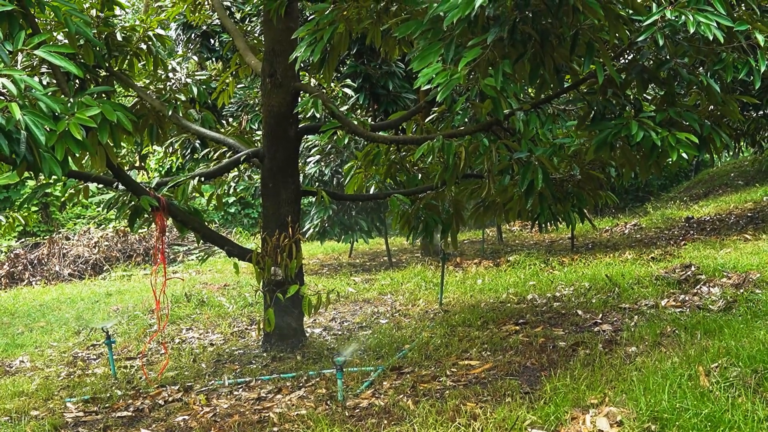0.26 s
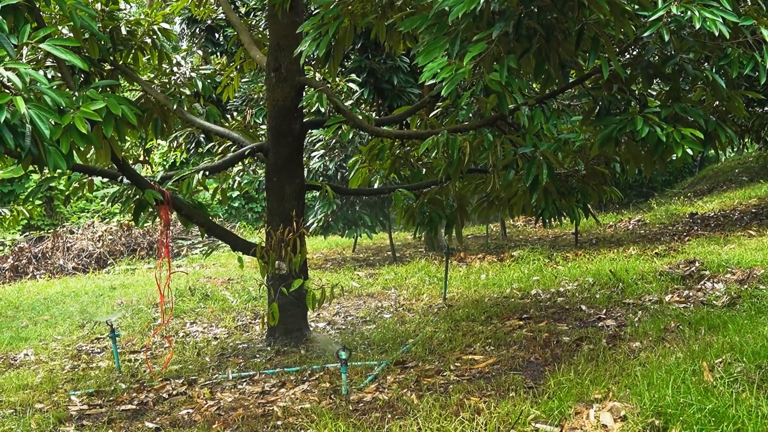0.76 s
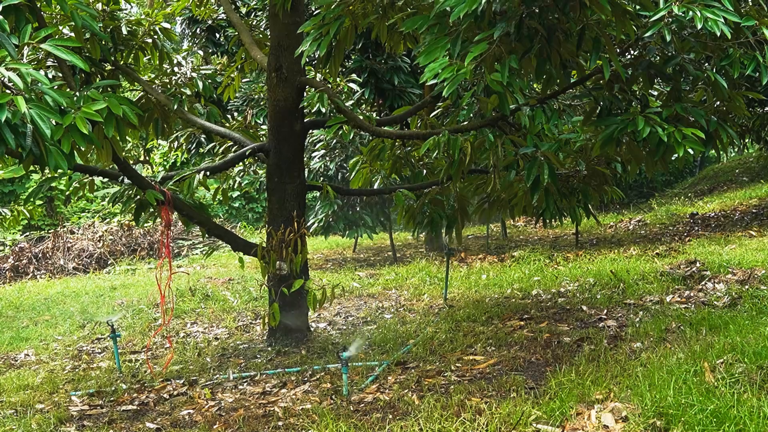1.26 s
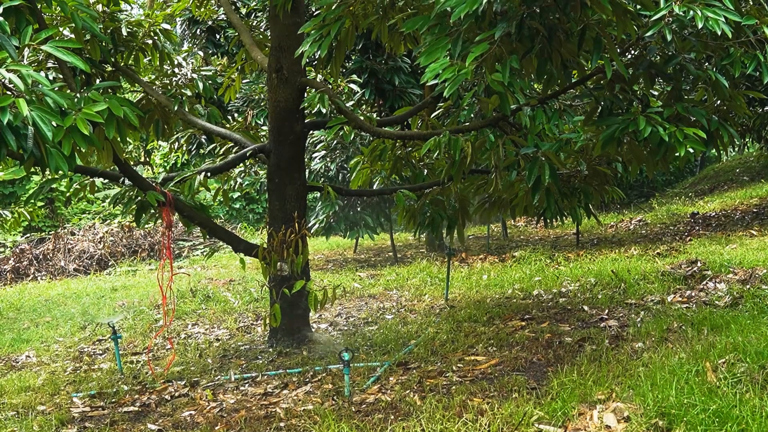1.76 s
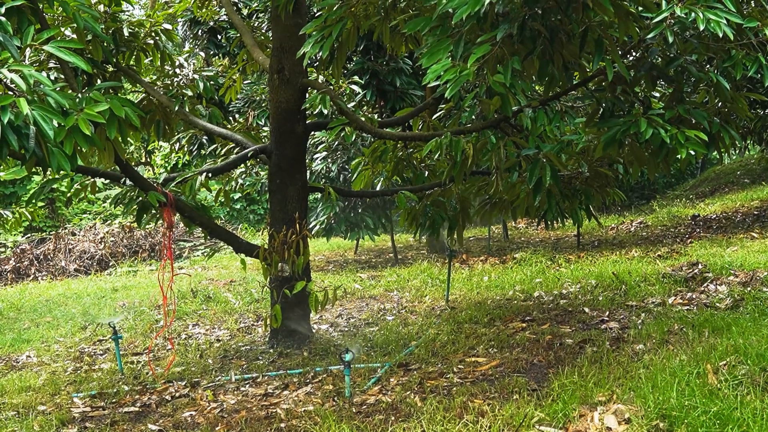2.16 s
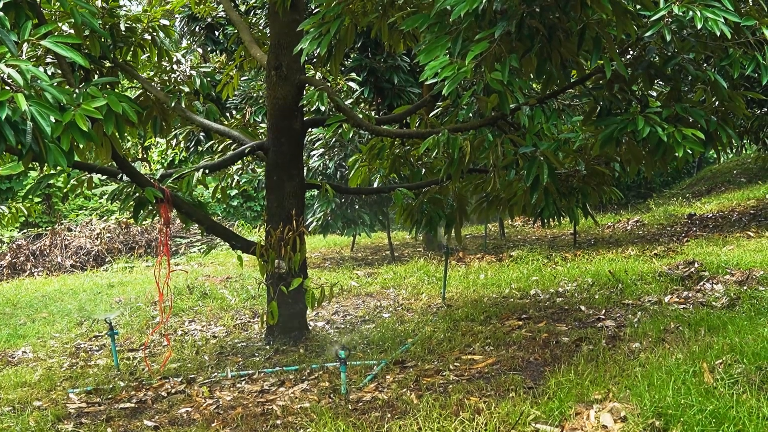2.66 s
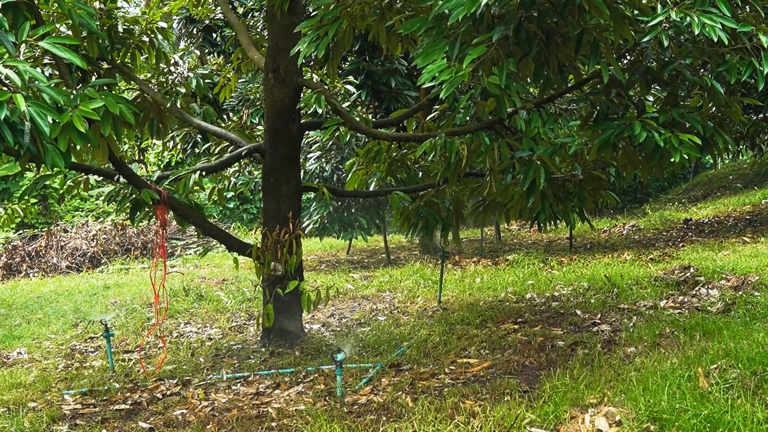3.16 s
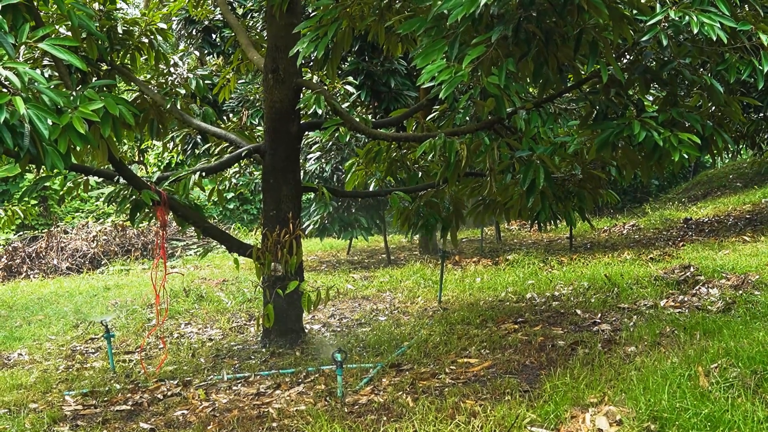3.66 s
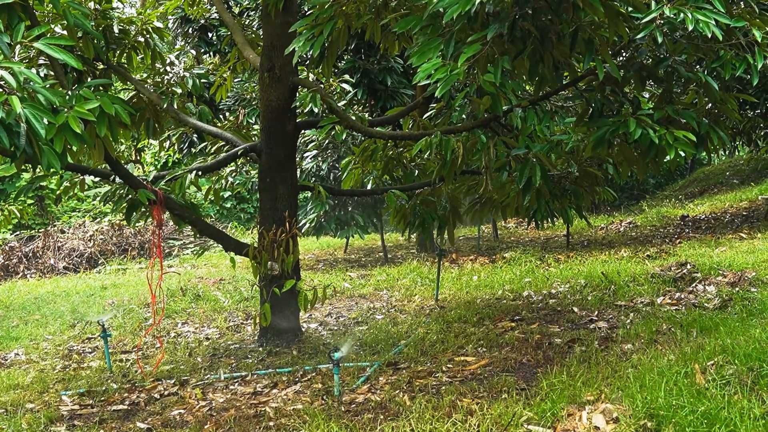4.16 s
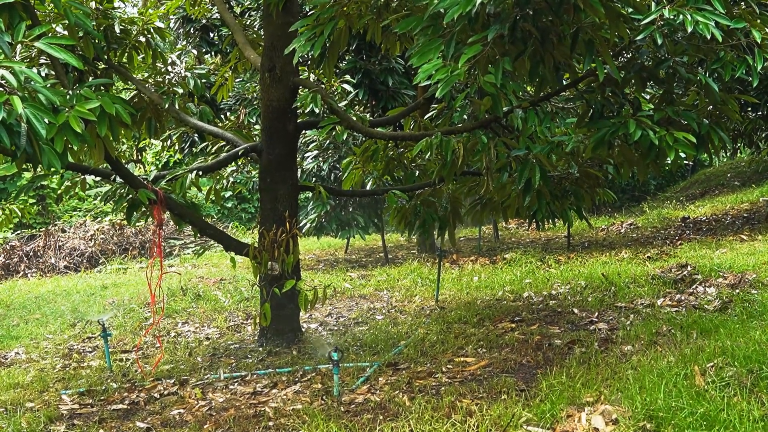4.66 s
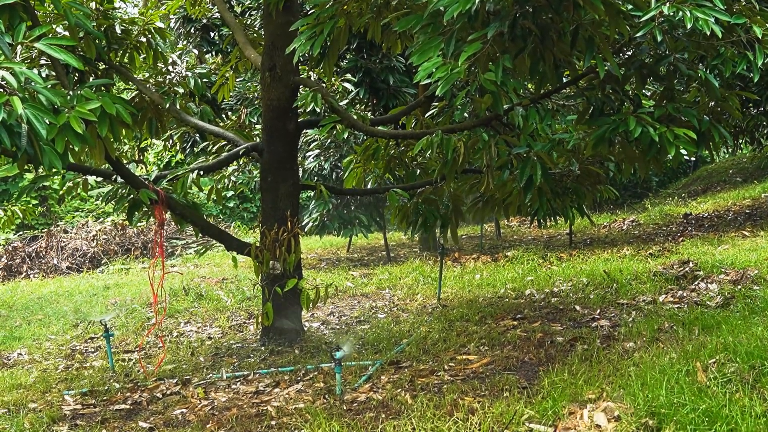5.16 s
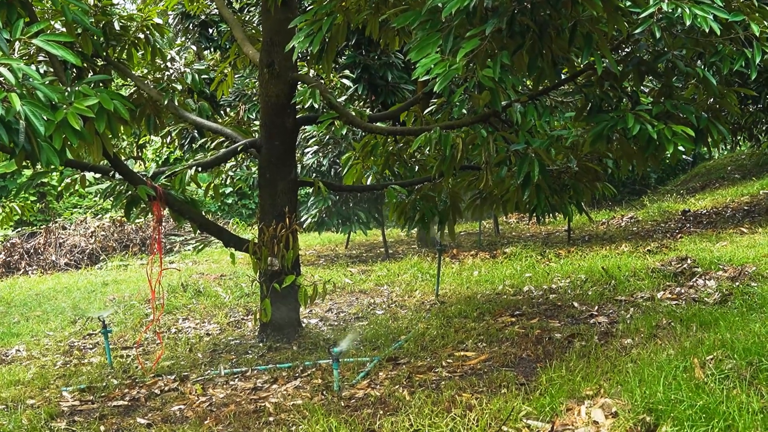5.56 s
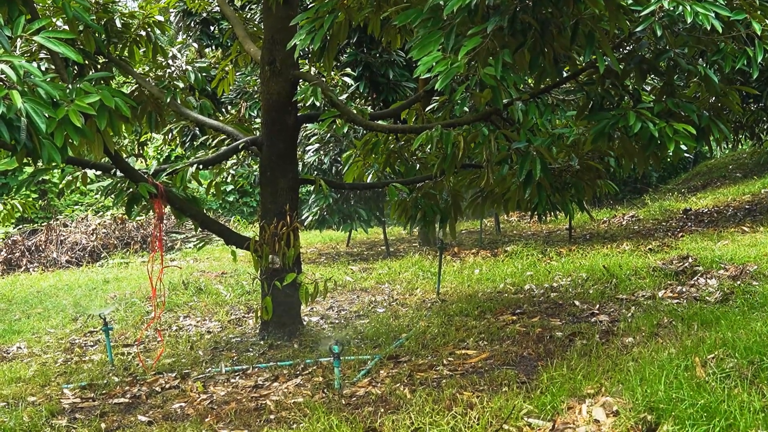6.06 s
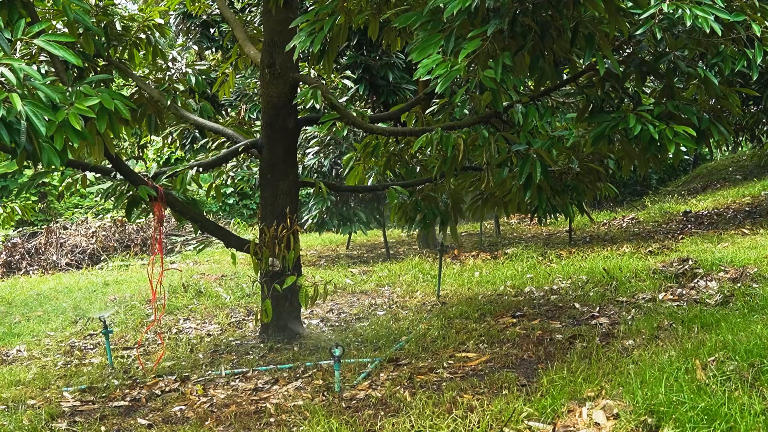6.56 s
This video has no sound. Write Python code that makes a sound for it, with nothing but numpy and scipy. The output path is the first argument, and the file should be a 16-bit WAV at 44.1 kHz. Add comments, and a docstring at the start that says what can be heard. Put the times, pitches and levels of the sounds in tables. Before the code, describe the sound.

Sprinklers under a leafy tree hiss without a break, their jets pattering on leaves in fast, soft pulses. Irregular heavy drops click and spatter nearby. High bird chips and a thin whistle come at about one second and again just after four; low, brief hoots with weak outdoor echoes answer from farther away. A faint, very high insect trill and rasp persists, with light breeze rumbling on the single microphone, the same in both channels.

```python
"""A smooth hiss of fine spray, made from coloured noise, runs throughout: sprinklers spin in an orchard.
Their jets sweep the leaf litter in quick flutters of random clicks, and fat drops tick and splash.
A small bird whistles twice and a larger one hoots further off, as gliding tones with weak echoes.
Pulsing tones near 7 kHz make insects trill and rasp; low noise makes light air rumble on a mono microphone."""
import sys
import numpy as np
from scipy import signal
from scipy.fft import rfft, irfft
from scipy.io import wavfile
from scipy.ndimage import uniform_filter1d

SR = 44100
rng = np.random.default_rng(int(sys.argv[2]) if len(sys.argv) > 2 else 0)


def log_audio(samples):
    """Write samples as a 16-bit WAV file to the path given in sys.argv[1]."""
    # one column per channel
    frames = np.atleast_2d(samples).T
    # limit to full scale, then quantise
    limited = np.clip(frames, -1, 1)
    pcm = np.round(limited * 32767).astype(np.int16)
    wavfile.write(sys.argv[1], SR, pcm)


N = 299880
TIME = np.arange(N) / SR

# colour of the even wash of mist and far sprinklers: (frequency [Hz], relative level [dB per Hz])
WASH_COLOUR = [(88, -22), (150, -1), (382, -1), (421, -1.5), (512, -1.5), (713, -0.5), (1360, 0.5),
               (2300, -1), (4370, -2.5), (5740, -6), (6450, -3.5), (6840, -9), (7530, -6.5), (12500, -10.5),
               (15800, -11)]
# colour of droplets landing on dry leaves: (frequency [Hz], relative level [dB per Hz])
PATTER_COLOUR = [(500, -29.5), (2000, -20), (4500, -1), (7000, 3), (9500, 2.5), (11000, -1), (12500, 2),
                 (14000, -8), (16000, -3)]
# one row a sprinkler head: (sweeps [per s], sharpness of the sweep [no unit], level [dB])
SPRINKLER_HEADS = [(21.43, 3.6, -51.5), (11.84, 2, -50), (13.17, 2.4, -55)]
# the leaves that droplets land on: (ring [Hz], width [Hz])
LEAF_RINGS = [(4500, 2800), (7500, 1500), (10000, 1000), (12500, 3700), (15000, 3800)]
# fat drops at set times; the row at 0.966 s adds a tick and splash under the small bird's second chip: (time
# [s], tick peak [dB], centre [Hz], splash level at its start [dB])
FAT_DROPS = [(.1576, -17, 5500, -40), (.1697, -16, 5000, -34), (.913, -24, 8500, -37.5),
             (.966, -25, 4500, -41), (1.211, -23, 5000, -39.5), (1.4232, -12.5, 4000, -39.5),
             (1.8914, -17.5, 14000, -40), (2.9537, -18, 3600, -37.5), (2.9665, -20, 8500, -37.5),
             (4.1442, -16.5, 4000, -37.5), (4.154, -20, 6000, -42), (4.579, -23, 6000, -43.5),
             (5.051, -22, 6500, -40), (5.4562, -16.5, 2800, -34.5), (5.921, -23, 5000, -38.5),
             (5.97, -23, 9500, -37)]
# small bird: (start [s], rise [s], fall [s], top pitch [Hz], end pitch [Hz], level before force [dB])
WHISTLE_NOTES = [(.927, 0.0098, 0.017, 6400, 4620, -36), (.965, .004, 0.0102, 6800, 4500, -40),
                 (1.064, .039, .093, 6040, 4570, -36.5), (4.097, .012, 0.015, 6340, 4140, -36.5),
                 (4.247, .032, .110, 6050, 4302, -35.5)]
# force along a whistle: (share of its length [0 to 1], added level [dB])
WHISTLE_FORCE_CURVE = [(0, -7.5), (.24, 3), (.5, -10.5), (.68, -4), (.85, 2), (1, 1.5)]
# how a whistle's pitch curves up to its top and down again: (rise power [no unit], fall power [no unit])
WHISTLE_CURVE = (2.5, 1.8)
# far bird: (start [s], rise [s], fall [s], foot pitch [Hz], top pitch [Hz], level before accent [dB],
# accent [dB], overtone level before the throat [dB])
HOOT_NOTES = [(1.574, 0.052, 0.04, 501, 726, -42.5, -3, -38.5),
              (3.82, 0.056, 0.042, 565, 955, -41, 8.5, -44), (3.96, 0.079, .042, 419, 955, -41, -1, -46),
              (4.147, .054, 0.051, 443, 750, -45, 1, -40), (5.921, 0.06, .029, 608, 970, -43.5, 10, -38),
              (6.316, 0.043, 0.03, 661, 941, -39.5, 6.5, -39),
              (6.684, 0.049, 0.025, 675, 930, -38.5, 8.5, -37)]
# every hoot climbs, lingers, tops out and drops:
# (phase [0 start, 1 top, 2 end], share of the way from foot to top pitch [0 to 1])
HOOT_PITCH_ARCH = [(0, 0), (.3, .42), (.62, .55), (.82, .86), (1, 1), (1.35, .65), (2, 0)]
# the throat resonance that shapes the far bird's overtone: (frequency [Hz], added level [dB])
THROAT_RESONANCE = [(1000, -13), (1200, -9.5), (1340, -4), (1450, -10), (1700, -15.5)]
# insects: (pitch [Hz], typical pitch wander [Hz], pulses [per s], level before swells [dB])
INSECT_VOICES = [(6940, 42.2, 19.4, -55), (6980, 70, 17, -53.5), (7050, 100, 94, -54)]
# colour of air on the microphone: (frequency [Hz], relative level [dB per Hz])
RUMBLE_COLOUR = [(3, -13), (8, -5), (11, -1.5), (16, -1), (22, -6.5), (30, -11), (45, -19), (60, -17.5),
                 (90, -21.5), (125, -20), (180, -32.5), (300, -34), (1000, -84)]
# strength of the breeze, before smoothing and the lift in air(): (time [s], level [dB])
BREEZE_STRENGTH = [(0.0, -44.5), (1.59, -41.5), (1.66, -50), (2.05, -32), (2.33, -45), (2.9, -44),
                   (2.93, -32), (3.05, -45), (3.39, -40.5), (4.75, -49.5), (4.85, -57), (5.13, -35.5),
                   (5.3, -55), (5.79, -40), (6.04, -51), (6.51, -43.5), (6.65, -58), (6.8, -48)]


def mist(hiss_db=-38.2, treble_db=-1.5, swell_db=0.07):
    """Fine spray everywhere merges into a smooth hiss, with slightly softened treble."""
    hiss = colour(rng.standard_normal(N), WASH_COLOUR)
    treble_filter = signal.butter(2, 5500, "high", fs=SR, output="sos")
    treble = signal.sosfiltfilt(treble_filter, hiss)
    softened = hiss + (amp(treble_db) - 1) * treble
    return amp(hiss_db + swell_db * drift(3.2)) * softened


def sprinklers(drops_per_s=1400, spread_db=5.0, wander_turns=.12, surge=0.42):
    """Each spinning jet throws a shower onto the leaves once a sweep; each leaf ticks at its own pitch."""
    out = np.zeros(N)
    for sweeps_per_s, sharpness, db in SPRINKLER_HEADS:
        turns = sweeps_per_s * TIME + rng.random() + wander_turns * drift(.5)
        shower = np.exp(sharpness * np.cos(2 * np.pi * turns) + surge * drift(5))
        per_s = drops_per_s * shower / shower.mean()
        ticks = sum(band(droplets(per_s, spread_db), hz, width_hz) for hz, width_hz in LEAF_RINGS)
        out += amp(db) * colour(ticks, PATTER_COLOUR)
    return out


def drips(stray_per_s=2, stray_tick_db=-23, stray_splash_db=-48, low_hz=5000, high_hz=12000):
    """The wet tree sheds fat drops at set times, and lesser ones at random."""
    out = np.zeros(N)
    for start, *drop in FAT_DROPS:
        add(out, start, drip(*drop))
    for when, leaf in rng.random((round(stray_per_s * N / SR), 2)):  # both are shares from 0 to 1
        leaf_hz = low_hz + (high_hz - low_hz) * leaf
        add(out, when * N / SR, drip(stray_tick_db, leaf_hz, stray_splash_db))
    return out


def drip(tick_db, hz, splash_db, splash_per_s=7000, decay_s=.022):
    """A fat drop slaps a leaf, then its fragments patter down around it as the splash dies away."""
    t = np.arange(SR // 8) / SR
    leaf = signal.butter(1, [hz / 2, min(hz * 1.6, 18000)], "band", fs=SR)
    tick = signal.lfilter(*leaf, signal.unit_impulse(len(t)))
    fragments = droplets(np.full(len(t), splash_per_s), 2.2)
    splash = evened(signal.lfilter(*leaf, fragments)) * np.exp(-t / decay_s)
    return amp(tick_db) * tick / abs(tick).max() + amp(splash_db) * splash


def droplets(per_s, spread_db):
    """Random clicks at a rate that may vary: many small, a few large."""
    size = amp(spread_db * np.minimum(rng.exponential(1, len(per_s)), 6))
    sign = rng.choice([-1, 1], len(per_s))
    lands = rng.random(len(per_s)) < per_s / SR
    return size * sign * lands


def birds(whistle_echo_db=-7, hoot_echo_db=-13):
    """The ground throws both birds back at once and the slope the hoots a little later; trees scatter both."""
    whistles, hoots = small_bird(), far_bird()
    out = whistles + hoots + trees(amp(whistle_echo_db) * whistles + amp(hoot_echo_db) * hoots)
    # the ground's copy beats against each gliding call
    add(out, .00393, amp(-8) * whistles + amp(-4.5) * hoots)
    add(out, .029, amp(-16) * hoots)  # the slope
    return out


def small_bird(flutter_db=2, foot=.82):
    """A short chip or two, then a thin whistle: each climbs from a share (foot) of its top and falls away."""
    out = np.zeros(N)
    rise_power, fall_power = WHISTLE_CURVE
    for start, rise_s, fall_s, top_hz, end_hz, db in WHISTLE_NOTES:
        t = np.arange(0, rise_s + fall_s, 1 / SR)
        climb_left = np.clip(1 - t / rise_s, 0, 1)
        fall = np.clip((t - rise_s) / fall_s, 0, 1)
        hz = top_hz * (1 - (1 - foot) * climb_left ** rise_power)
        hz = hz + (end_hz - top_hz) * fall ** fall_power
        force_db = np.interp(t / t[-1], *np.transpose(WHISTLE_FORCE_CURVE))
        flutter = evened(band(rng.standard_normal(len(t)), 0, 86))
        level = amp(db + force_db + flutter_db * flutter)
        tone = np.sin(waver(hz, jitter=0.007))
        add(out, start, level * signal.windows.tukey(len(t), .1) * tone)
    return out


def far_bird(accent_at=0.51, accent_s=0.011):
    """Arching hoots with an accent part way up the rise; the overtone flares at the throat resonance."""
    out = np.zeros(N)
    for start, rise_s, fall_s, foot_hz, top_hz, db, accent_db, overtone_db in HOOT_NOTES:
        t = np.arange(0, rise_s + fall_s, 1 / SR)
        stage = np.interp(t, [0, rise_s, rise_s + fall_s], [0, 1, 2])
        arch = np.interp(stage, *np.transpose(HOOT_PITCH_ARCH))
        hz = foot_hz + (top_hz - foot_hz) * arch
        push = np.exp(-.5 * ((t - accent_at * rise_s) / accent_s) ** 2)
        phase = waver(hz, jitter=.008)
        main_tone = amp(db + accent_db * push) * np.sin(phase)
        overtone = amp(overtone_db + read(THROAT_RESONANCE, 2 * hz)) * np.sin(2 * phase)
        add(out, start, (main_tone + overtone) * signal.windows.tukey(len(t), .25))
    return out


def waver(hz, jitter):
    """The phase of a slightly unsteady pitch; jitter is its typical share of the pitch."""
    shake = evened(band(rng.standard_normal(len(hz)), 0, 79.0))
    return 2 * np.pi * np.cumsum(hz * (1 + jitter * shake)) / SR


def trees(x, t60=0.19, first_s=0.011):
    """Trunks and foliage scatter weak echoes that fade by 60 dB every t60 seconds."""
    t = np.arange(SR // 2) / SR
    hits = rng.standard_normal(len(t)) * (rng.random(len(t)) < 1500 / SR)  # about 1500 echoes per s
    taps = hits * (t > first_s) * amp(-60 * t / t60)
    return signal.fftconvolve(x, taps / np.linalg.norm(taps))[:N]


def insects(swell_db=1, pulse_sharpness=.9, wander_rate_hz=35):
    """Two trills and a fast rasp, in soft pulses whose pitch wanders quickly."""
    out = np.zeros(N)
    for hz, wander_hz, pulses_per_s, db in INSECT_VOICES:
        turns = pulses_per_s * TIME + rng.random() + .1 * drift(.5)
        pulse = np.exp(pulse_sharpness * np.cos(2 * np.pi * turns))
        pitch_hz = hz + wander_hz * drift(wander_rate_hz)
        wing = np.sin(2 * np.pi * np.cumsum(pitch_hz) / SR)
        out += amp(db + swell_db * drift(2.2)) * evened(wing * pulse)
    return out


def air(lift_db=2, steady_db=-41):
    """The deepest rumble follows the breeze; the bass above it stays steady."""
    rumble = colour(rng.standard_normal(N), RUMBLE_COLOUR)
    deep = signal.sosfiltfilt(signal.butter(3, 52, fs=SR, output="sos"), rumble)
    breeze_db = np.interp(TIME, *np.transpose(BREEZE_STRENGTH))
    breeze_db = uniform_filter1d(breeze_db, size=8000)  # rounds the corners
    return amp(lift_db + breeze_db) * deep + amp(steady_db) * (rumble - deep)


def amp(db):
    """Turns decibels into a gain."""
    return 10 ** (np.asarray(db) / 20)


def evened(x):
    """Scales a sound to an average strength (rms) of 1."""
    return x / np.sqrt(np.mean(x ** 2) + 1e-20)


def read(points, hz):
    """Reads a level between table points, on a log-frequency axis."""
    f, db = np.transpose(points)
    return np.interp(np.log(hz + 1), np.log(f + 1), db)


def colour(x, points):
    """Filters x by a table of levels, then scales it to rms 1."""
    f = np.fft.rfftfreq(len(x), 1 / SR)
    return evened(irfft(rfft(x) * amp(read(points, f)), len(x)))


def band(x, hz, width_hz):
    """Keeps a smooth band around hz; around zero it keeps only slow changes."""
    f = np.fft.rfftfreq(len(x), 1 / SR)
    return irfft(rfft(x) * np.exp(-.5 * ((f - hz) / width_hz) ** 2), len(x))


def drift(rate_hz):
    """A smooth random wander of rms 1; a higher rate wanders faster."""
    return evened(band(rng.standard_normal(N), 0, rate_hz))


def add(mix, start_s, sound):
    """Mixes a sound in at a start time."""
    part = mix[round(start_s * SR):][:len(sound)]
    part += sound[:len(part)]


def scene():
    """Water, birds, insects and air, alike in both channels."""
    mono = mist() + sprinklers() + drips() + birds() + insects() + air()
    return np.array([mono, mono])


def record(dry, edge_hz=15850):
    """Low-passes the whole scene at edge_hz, leaving out the very highest treble."""
    low_pass = signal.firwin(511, edge_hz, window=("kaiser", 9), fs=SR)
    return signal.oaconvolve(dry, low_pass[None], "same")


dry = scene()
out = record(dry)
log_audio(out)
```